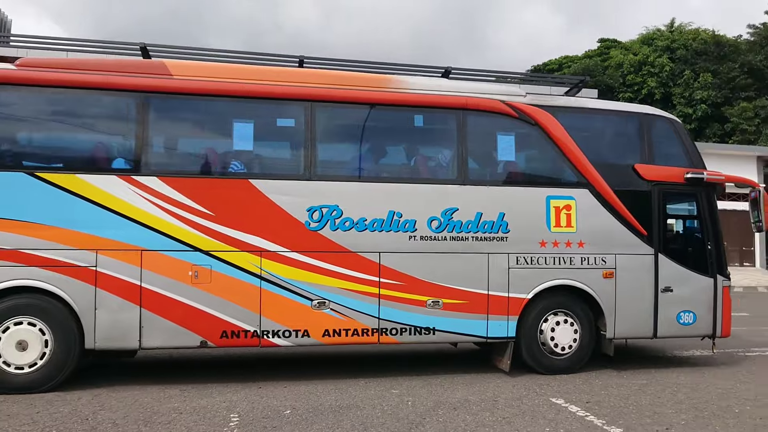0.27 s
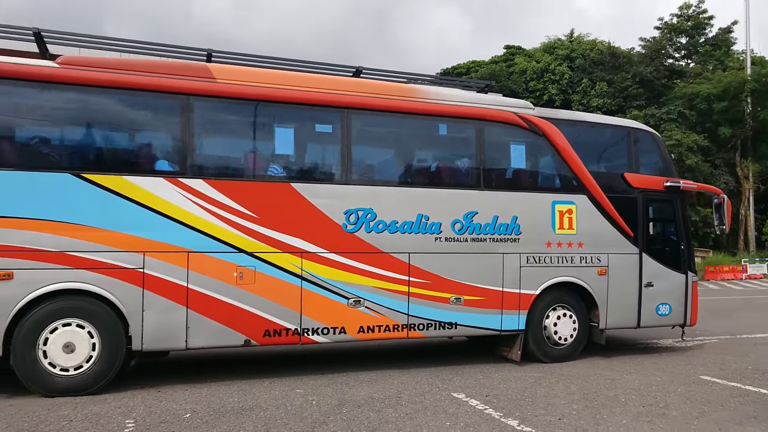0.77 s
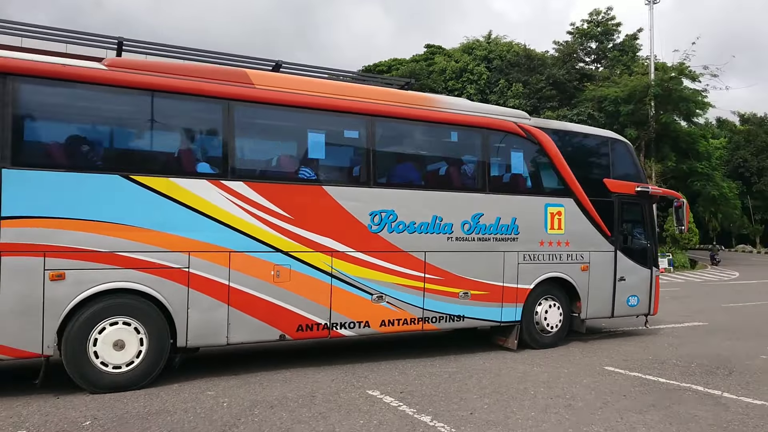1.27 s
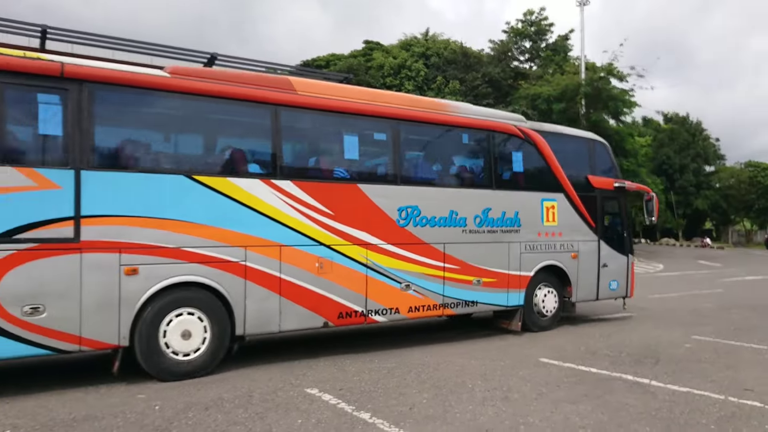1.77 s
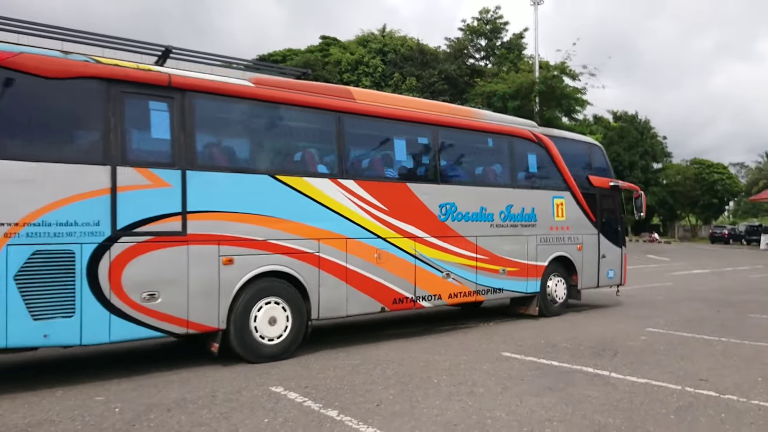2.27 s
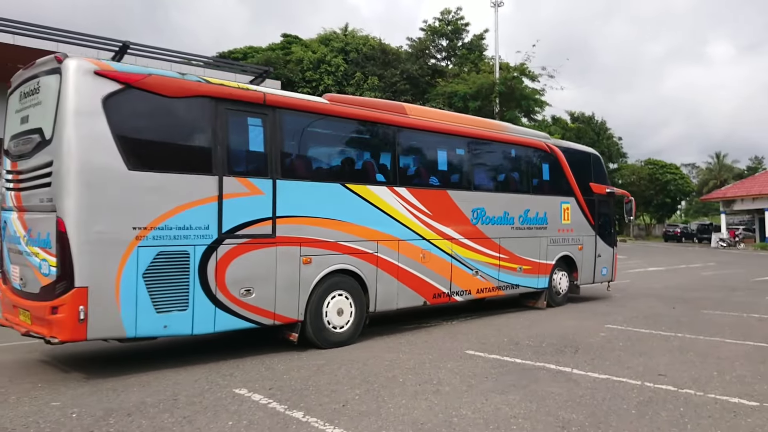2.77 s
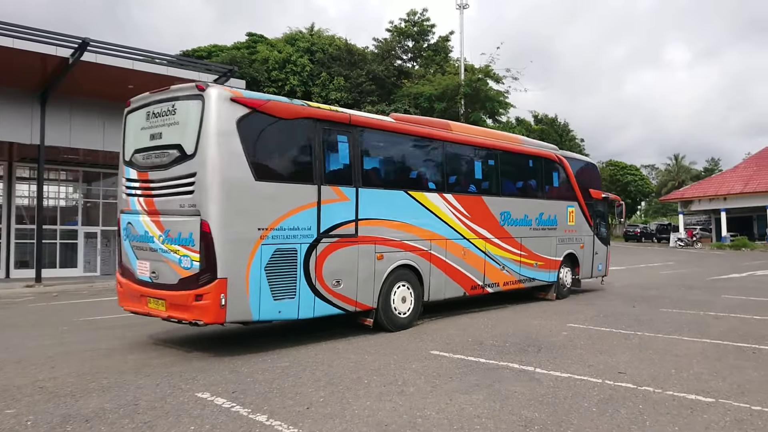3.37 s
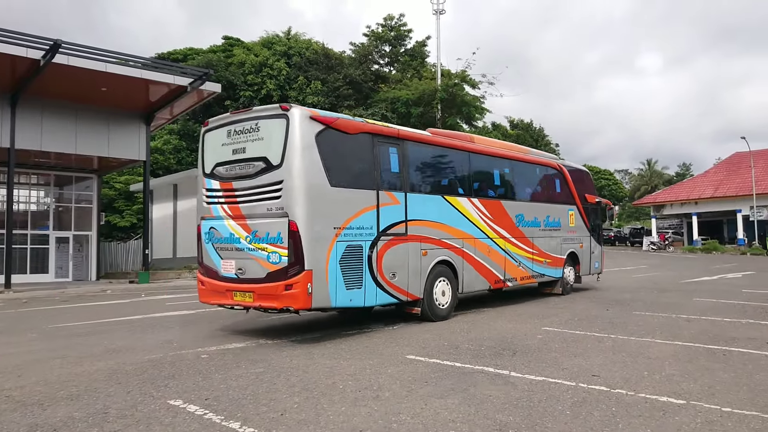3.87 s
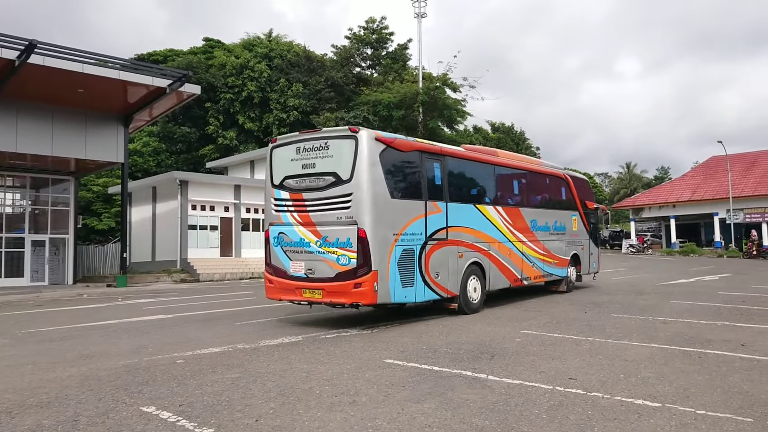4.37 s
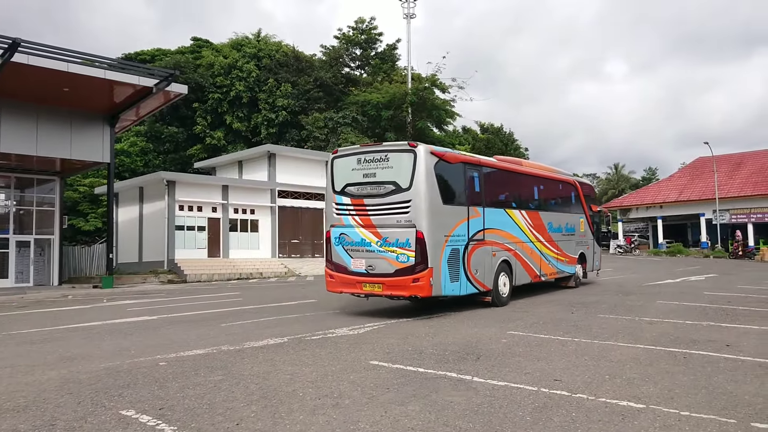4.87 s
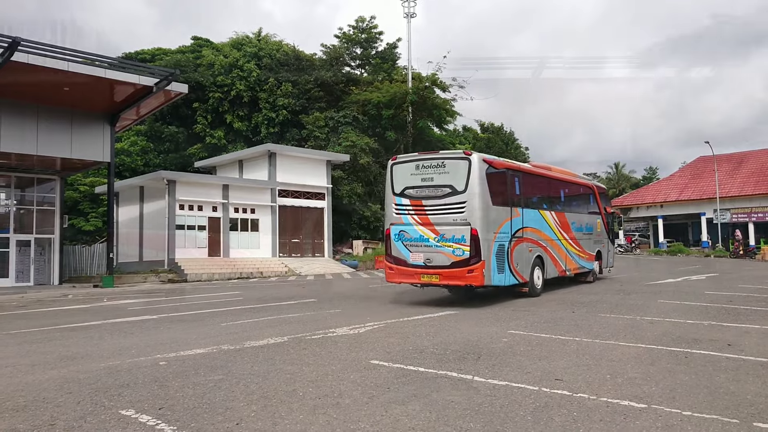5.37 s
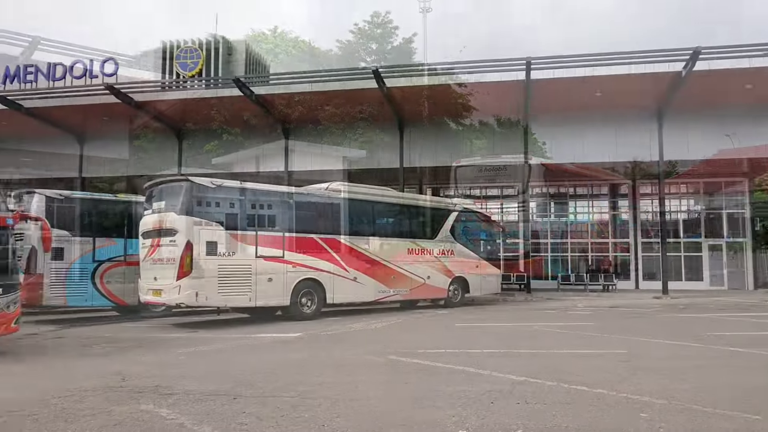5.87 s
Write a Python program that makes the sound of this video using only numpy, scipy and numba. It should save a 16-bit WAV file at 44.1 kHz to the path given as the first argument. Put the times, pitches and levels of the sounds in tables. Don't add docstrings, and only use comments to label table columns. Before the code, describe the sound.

A heavy six-cylinder diesel coach is heard outdoors, a few metres from a stereo phone on an open asphalt yard. From 0 s its deep engine note drops and weakens with the clutch out, lowest near 0.95 s, over exhaust rumble, dull clatter and airy fan noise; a barely audible air leak flicks at 0.9 s. At about 1.3 s the throttle opens and the engine surges, pulling with a thick, throbbing growl. At 2.3 s an air valve opens sharply into a steady, bright hiss as the tail passes; clatter hardens, and thin, sagging whistles and hollow panel resonances colour it until about 4.2 s. The hiss eases after 3.7 s and closes down around 4.5 to 5 s while the engine pitch climbs slowly. A soft last puff comes near 5.3 s, then the coach grows quieter and duller until 6.1 s.

```python
import sys
import numpy as np
from scipy import signal
from scipy.fft import rfft, irfft
from scipy.io import wavfile
from scipy.ndimage import uniform_filter1d, map_coordinates
from numba import njit

SR = 44100
rng = np.random.default_rng(int(sys.argv[2]) if len(sys.argv) > 2 else 0)


def gain_from_decibels(decibels):
    exponent = np.asarray(decibels, float) / 20
    return 10 ** exponent


def digitize_waveform(pressure):
    field = np.atleast_2d(pressure).T
    bounded = np.clip(field, -1, 1)
    quanta = np.round(bounded * 32767).astype(np.int16)
    wavfile.write(sys.argv[1], SR, quanta)


N = 269892
T = np.arange(N) / SR
BINS = np.maximum(np.fft.rfftfreq(N, 1 / SR), 1)


def unit(x):
    return x / np.sqrt(np.mean(x ** 2))


def curves(table):
    s, *columns = np.transpose(table)
    return [np.interp(T, s, c) for c in columns]


def over_hz(table):
    hz, value = np.transpose(table)
    return np.interp(np.log(BINS), np.log(hz), value)


def walk(rate_hz):
    hold = int(SR / rate_hz)
    steps = np.repeat(rng.standard_normal(N // hold + 1), hold)
    return 1.98 * uniform_filter1d(uniform_filter1d(steps, hold), hold)[:N]


def rise(start_s, length_s):
    return np.sin(np.pi / 2 * np.clip((T - start_s) / length_s, 0, 1)) ** 2


def both(*levels_db):
    return np.sqrt(sum(gain_from_decibels(db) ** 2 for db in levels_db))


@njit
def svf(x, hz, width):
    y, band, low = np.empty(len(x)), 0., 0.
    for i in range(len(x)):
        g, k = np.tan(np.pi * hz[i] / SR), width / hz[i]
        v = (band + g * (x[i] - low)) / (1 + g * (g + k))
        band, low, y[i] = 2 * v - band, low + 2 * g * v, k * v
    return y


# (f/Hz, correlation)
LIKENESS = [(60, .99), (125, .997), (250, .93), (500, .76), (1000, .62), (2200, .58), (4500, .68),
            (7000, .4), (10000, .28)]
# (f/Hz, phase/rad)
TWIST = [(700, 0), (1200, 1.5), (1900, 0.5), (2500, 5.5), (3400, 8)]


def field():
    direct, scattered = rfft(rng.standard_normal((2, N)))
    like = np.clip(over_hz(LIKENESS), 0, 1)
    right = like * direct * np.exp(-1j * over_hz(TWIST)) + np.sqrt(1 - like ** 2) * scattered
    return np.array([direct, right])


def patchy(spectrum, drift_db, flicker_db, count):
    noise, hz = field() * gain_from_decibels(over_hz(spectrum)), np.array(spectrum)[:, 0]
    place = count * np.log(BINS / hz[0]) / np.log(hz[-1] / hz[0])
    out = 0
    for k in range(count + 1):
        share = np.sin(np.pi / 2 * np.clip(1 - abs(place - k), 0, 1))
        out = out + irfft(noise * share, N) * gain_from_decibels(drift_db * walk(4.05) + flicker_db * walk(14))
    return unit(out)


# (t/s, firing rate f/Hz, engine level at the phone/dB)
ENGINE = [(0.0, 79.54, -21), (0.35, 62.36, -25), (0.7, 49.7, -28), (0.95, 46.4, -30), (1.14, 50.5, -29.5),
          (1.27, 54.89, -26), (1.45, 62.73, -23.5), (1.75, 63.16, -22), (2.25, 54.11, -22.5),
          (2.6, 59.56, -23), (2.88, 57.73, -22), (3.1, 62.3, -22), (4.0, 67.44, -22), (4.6, 73.5, -22),
          (5.15, 78.37, -22), (5.5, 79.25, -24.5), (5.8, 81.8, -26), (6.12, 84.4, -29)]


def engine_run():
    hz, engine_db = curves(ENGINE)
    return hz, engine_db, np.cumsum(hz) / SR


TONES = (1, 3 / 2, 2, 3, 13 / 3)
# (f/Hz, width/Hz, level over engine/dB, loss off throttle/dB, loss while tail is hidden/dB)
TONE_RINGS = [
    (64, 39, -2, 9, 6.5),
    (91, 42, -8.5, -4, 4),
    (146.7, 15, -6.5, 12, 7),
    (174.3, 32, -10, 13, -0.5),
    (308.7, 82, -1.5, -8, 4),
]


def engine_tones(hz, engine_db, turns, throttle, tail):
    clutch_db = 11 * (rise(.75, 0.29) - rise(1.4, 0.21))
    out = 0
    for k, (ring_hz, width_hz, db, off_db, hidden_db) in zip(TONES, TONE_RINGS):
        detune_db = 17 * np.log10(1 + (2 * (k * hz - ring_hz) / width_hz) ** 2)
        level_db = engine_db + db - clutch_db - detune_db
        level_db = level_db - off_db * (1 - throttle) - hidden_db * (1 - tail) + .8 * walk(9)
        out = out + np.sqrt(2) * gain_from_decibels(level_db) * np.sin(2 * np.pi * (k * turns + .018 * walk(12)))
    return out


CYLINDER_DB = [-2, 0, -0.5, -0.5, 1.7, -3]
# (f/Hz, width/Hz, level/dB)
EXHAUST = [(61.3, 18.4, 9), (92.7, 16, 4), (202, 11, 10), (339, 46, 3.5)]


def firings(turns):
    count = np.floor(turns).astype(int)
    chance_db = 3.8 * rng.standard_normal(count[-1] + 1)[count]
    size = gain_from_decibels(np.array(CYLINDER_DB)[count % 6] + chance_db)
    blows = np.diff(count, prepend=0) * (size - .9)
    out = 0
    for k, (hz, width_hz, db) in enumerate(EXHAUST):
        out = out + (-1) ** k * gain_from_decibels(db) * svf(blows, np.full(N, 1. * hz), 1. * width_hz)
    return unit(out)


# (f/Hz, level per Hz/dB)
RUMBLE = [(25, -68), (35, -29), (44, 2), (60, -6.5), (100, 1), (200, -0.5), (300, -0.5), (400, -3.5),
          (520, -23.5), (800, -14.5)]


def exhaust(turns, engine_db):
    return gain_from_decibels(engine_db) * (patchy(RUMBLE, 0.36, 0.2, count=8) + gain_from_decibels(-9.5) * firings(turns))


def knock(turns):
    return unit(1 + 0.069 * np.cos(2 * np.pi * turns) + 0.056 * np.cos(np.pi * turns))


# (f/Hz, level per Hz/dB)
DRONE = [(300, -14), (450, 3), (620, -3), (800, -0.5), (950, -0.5), (1150, -3.5), (1500, -7), (2200, -9)]


def drone(turns, engine_db, tail):
    return gain_from_decibels(engine_db - 6.0 + 2.2 * tail) * knock(turns) * patchy(DRONE, 0.78, 0.13, count=6)


# (f/Hz, level per Hz/dB)
CLATTER = [(1000, 3), (1500, -8), (2100, 0.5), (2700, 3), (3400, 2), (4200, -10.5)]


def block_clatter(turns, clatter):
    return clatter * gain_from_decibels(2.5) * knock(turns) * patchy(CLATTER, 0.44, 0.83, count=6)


# (f/Hz, level per Hz/dB)
FIZZ = [(7200, -33), (8200, -19), (9500, 3), (11500, -13), (13500, -4), (16000, -29)]


def clatter_fizz(clatter):
    return clatter * gain_from_decibels(-25.5) * patchy(FIZZ, .5, 0.94, count=3)


# (t/s, flow level/dB)
VALVE = [
    (2.285, -47),
    (2.38, -35),
    (2.7, -34.5),
    (3.65, -35.5),
    (3.85, -38),
    (4.3, -38),
    (4.5, -43),
    (5.0, -53.5),
    (5.4, -66),
]


def valve_flow():
    return curves(VALVE)[0] - 40 * (T < VALVE[0][0])


# (f/Hz, level per Hz/dB)
HISS_MID = [(2800, -26), (3600, -5.5), (4200, 1.5), (5200, -3), (6000, -6.5), (6500, -15.5), (7300, -33),
            (8200, -77)]


def air(fan_db, flow_db):
    return both(fan_db - 19.5, 0.83 * flow_db + 1.0) * patchy(HISS_MID, 0.38, 1.18, count=6)


# (f/Hz, level per Hz/dB)
HISS_TOP = [(5800, -21), (6700, -11), (7500, -11.5), (8300, -10.5), (9200, -2.5), (10200, 4.5), (12500, 4),
            (15000, 0.5), (16500, -11.5)]
# (t/s, half length/s, level/dB)
PUFFS = [
    (0.882, 0.043, -60),
    (5.346, .3, -50),
]


def spray(fan_db, flow_db):
    puffs_db = [db - 6 * ((T - s) / half_s) ** 2 for s, half_s, db in PUFFS]
    gain = both(fan_db - 32.5, flow_db + 1.5, *puffs_db)
    return gain * gain_from_decibels(0.44 * walk(18)) * patchy(HISS_TOP, 0.83, 0.74, count=4)


def rings(table, sharp, sag_per_s):
    noise, out = irfft(field(), N), np.zeros((2, N))
    for start, end, first_hz, db, pan_db in table:
        span = slice(max(int(start * SR), 0), min(int(end * SR), N))
        hz = first_hz * (1 - sag_per_s * (T[span] - start))
        width_hz = sharp * first_hz
        ring = unit(np.array([svf(svf(x[span], hz, width_hz), hz, width_hz) for x in noise]))
        swell = signal.windows.tukey(len(hz), .6)
        out[:, span] += ring * swell * gain_from_decibels(db + np.array([[pan_db], [-pan_db]]) / 2)
    return out


# (start t/s, end t/s, first f/Hz, level/dB, left minus right/dB)
GRILLE = [
    (2.3, 2.897, 5480, -44, -17),
    (2.3, 2.85, 4880, -37.5, 1),
    (2.84, 3.15, 4815, -37, -8),
    (2.95, 3.42, 4685, -29.5, 4.5),
    (3.35, 3.65, 5180, -31.5, 1),
    (3.48, 4.0, 4574, -31, 9.5),
    (3.45, 3.95, 4670, -40, -10),
    (4.0, 4.25, 4300, -41, -4),
]
PIPES = [(.2, .42, 940, -36, 9), (.65, 0.893, 489, -37.5, -11), (.85, .95, 2870, -41, 1),
         (1.098, 1.448, 209, -32, -2), (1.5, 2.15, 206.6, -33, 2), (1.5, 2.203, 5540, -48.5, -10),
         (2.24, 2.74, 2680, -31, 1), (2.2, 4.6, 6970, -52.5, 3.5), (3.0, 3.35, 2680, -42, 10),
         (1.5, 2.05, 2794, -44.5, -6), (1.5, 2.0, 2210, -39, -3), (2.4, 3.1, 296, -31, 2),
         (2.5, 2.8, 3870, -39, 14), (4.55, 5.0, 5396, -43.5, -9)]
PANELS = [(0, 1.26, 975, -45.5, 14), (1.3, 2.35, 2820, -39, -6), (1.3, 2.3, 4580, -48, -4),
          (1.45, 2.6, 2140, -36.5, 2.5), (2.6, 2.9, 3910, -40.5, 6), (2.95, 4.78, 2550, -47.5, 23),
          (3.25, 3.6, 1630, -35.5, 0), (3.95, 5, 4400, -37.5, 3.5), (4.2, 5.54, 2960, -51, -18),
          (2.5, 3.6, 803, -36, 2), (4.2, 6.1, 612, -35, -4.5), (4.5, 5.79, 770, -33.5, 1),
          (4.7, 5.896, 4360, -40.5, -3), (5.8, 6.12, 4460, -50, -11), (2.3, 3.9, 3500, -39, 11.5),
          (.4, 2.3, 5400, -56.5, -13)]


def grille():
    narrow = rings(GRILLE, .033, 0.088) + rings(PIPES, .052, 0)
    return gain_from_decibels(1.2 * walk(9)) * narrow + rings(PANELS, .17, 0.044)


def fan_level(engine_db, throttle, tail):
    return -23.5 + 0.6 * (engine_db + 22.5) + 5.3 * throttle - 3.2 * tail - 7 * rise(5.6, 0.67)


# (t/s, lag/samples)
GROUND = [(0, 10.7), (1.6, 12.6), (2.3, 11.8), (4.4, 18), (5.6, 13.3), (6.12, 11.4)]


def asphalt(x):
    heard = np.arange(N) - curves(GROUND)[0]
    return x + .17 * np.array([np.interp(heard, np.arange(N), port) for port in x])


def late(x, samples):
    return np.array([x[0], map_coordinates(x[1], [np.arange(N) - samples], order=3, mode="nearest")])


# (t/s, lag of the right port/samples, left minus right level of the mids/dB)
BEARING = [
    (0, 16.4, -5.5),
    (.7, 18, -4.5),
    (1.7, 16.4, -2),
    (2.4, 14.2, -2),
    (3.2, 18.35, 1),
    (3.7, 17.7, 1.5),
    (4.1, 6.5, 0.5),
    (4.7, 4.3, 0),
    (6.12, 4.94, -2),
]


def at_ports(low, drone_noise, block, open_air):
    lag, pan_db = curves(BEARING)
    side = gain_from_decibels(np.array([pan_db, -pan_db]) / 2)
    return late(low, .42 * lag) + late(drone_noise, .7 * lag) + late(side * block + open_air, lag)


def scene():
    hz, engine_db, turns = engine_run()
    throttle, tail = rise(1.27, .4), rise(2.5, 1.0)
    fan_db, flow_db = fan_level(engine_db, throttle, tail), valve_flow()
    jet_db = flow_db - 5.5 * (T - VALVE[1][0])
    clatter = both(engine_db - 14.5 + 1.9 * tail, jet_db + 6.5)
    low = engine_tones(hz, engine_db, turns, throttle, tail) + exhaust(turns, engine_db)
    block = block_clatter(turns, clatter)
    treble = asphalt(spray(fan_db, flow_db) + clatter_fizz(clatter))
    return at_ports(low, drone(turns, engine_db, tail), block, grille() + air(fan_db, flow_db)) + treble


def thin(x):
    frame, band_bins, shift = 2048, 8, 170
    from_hz, top_hz, reach_hz, under_db = 6000, 15600, 5000, -11.0
    hz, _, z = signal.stft(np.pad(x, ((0, 0), (shift, 0))), SR, "cosine", frame)
    power = abs(z) ** 2
    bins = np.arange(len(hz))
    centre = bins // band_bins * band_bins + band_bins // 2 * (hz < top_hz)
    band = uniform_filter1d(power, band_bins, axis=1)[:, centre]
    mask = uniform_filter1d(power.max(axis=0), int(reach_hz * frame / SR), axis=0)
    mask = uniform_filter1d(mask, size=12, axis=1, origin=5)
    whim_db = 1.9 * rng.standard_normal(band.shape)[:, bins // band_bins]
    keep = (band > mask * gain_from_decibels(2 * (under_db + whim_db))) | (hz < from_hz)[:, None]
    kept = z * keep * (hz < top_hz)[:, None]
    return signal.istft(kept, SR, "cosine", frame)[1][:, shift:shift + N]


def band_limit(x):
    return signal.sosfilt(signal.butter(12, 16090, fs=SR, output="sos"), x)


# (f/Hz, left minus right level/dB)
PORTS = [(60, 2.5), (125, 1.5), (250, -1), (500, 1.3), (1300, -1.3), (4500, .2), (6500, 1), (7200, 6),
         (8300, 20), (9200, 14), (9900, 10.5), (12500, 9.3), (14000, 10.5), (15500, 17)]


def record(dry):
    tilt_db = over_hz(PORTS)
    colour = gain_from_decibels(np.array([tilt_db, -tilt_db]) / 2)
    bass_cut = 1 + (38 / BINS) ** 8
    ports = irfft(rfft(dry) * colour / bass_cut, N)
    return band_limit(thin(ports))


dry = scene()
out = record(dry)
digitize_waveform(out)
```